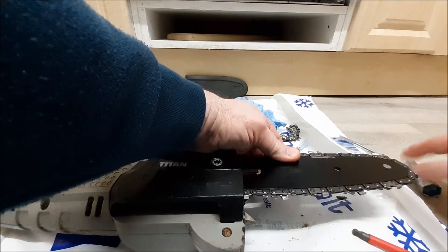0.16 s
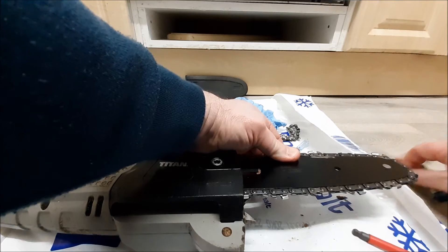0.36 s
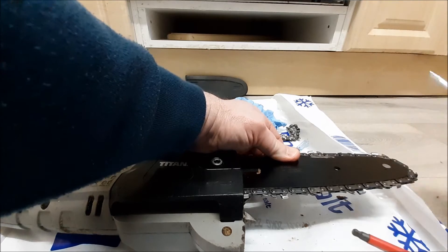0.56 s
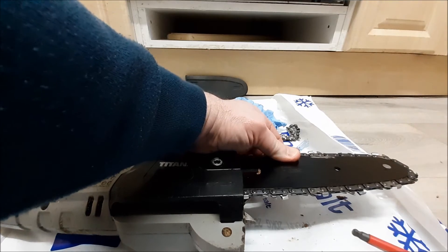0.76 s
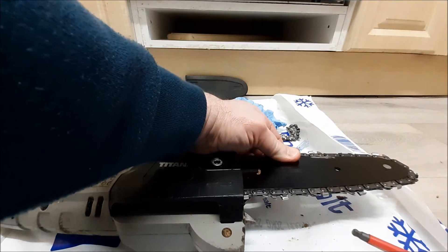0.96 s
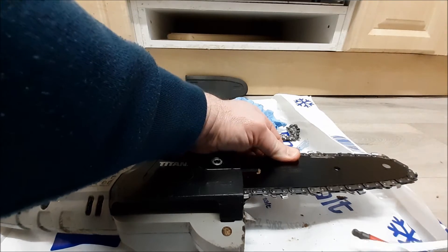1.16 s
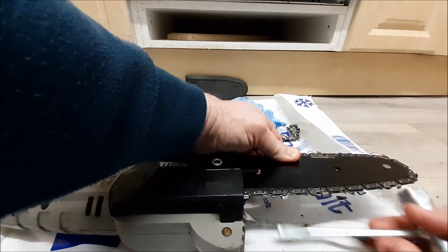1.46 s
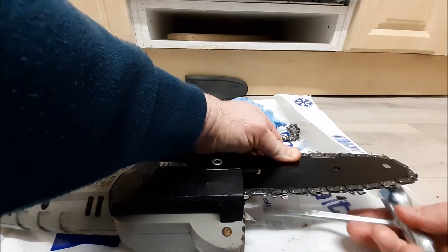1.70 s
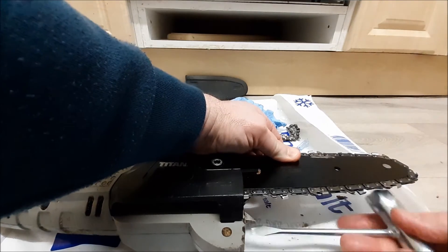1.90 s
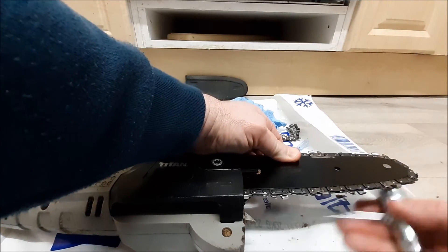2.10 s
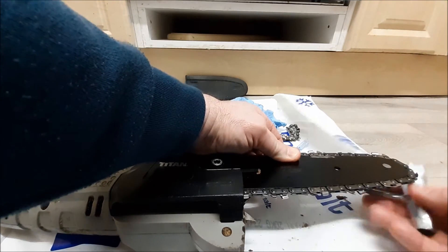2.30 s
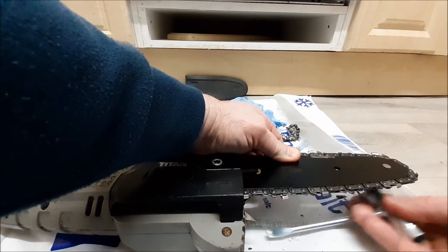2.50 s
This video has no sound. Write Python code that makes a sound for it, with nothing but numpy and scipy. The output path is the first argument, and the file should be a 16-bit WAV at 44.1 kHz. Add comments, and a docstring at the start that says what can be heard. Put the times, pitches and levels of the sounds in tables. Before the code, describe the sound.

A loose saw chain clinks and rattles on its metal bar, heard close in a small kitchen over faint low rumble. A wrench clacks down at 0.35 s; a sleeve swishes softly until about 1.3 s, with a thin ting at 1.0. Light taps and ticks start at 1.5, a bright snap at 1.8, a bar clank at 2.08, then dense scraping rattle, loudest around 2.3, thinning after 2.45.

```python
"""A steel wrench, a slack saw chain and its bar knock together on a kitchen floor, close to the microphone.
The wrench is put down and a sleeve swishes; then the wrench taps the bar and drags the chain along its groove,
so that the links rattle, scrape and snap back with bright clinks. A small room answers over a low rumble.
Knocks are decaying noise bands and ringing modes; scrapes, cloth and rumble are coloured noise."""
import sys
import numpy as np
from scipy import signal
from scipy.fft import rfft, irfft
from scipy.io import wavfile

SR = 44100
rng = np.random.default_rng(int(sys.argv[2]) if len(sys.argv) > 2 else 0)


def file_out(sig):
    """Save sig as 16-bit WAV at sys.argv[1]."""
    # one column per channel
    cols = np.atleast_2d(sig).T
    # limit, then scale
    lim = np.clip(cols, -1, 1)
    pcm = np.round(lim * 32767).astype(np.int16)
    wavfile.write(sys.argv[1], SR, pcm)


N = 116865  # length in samples

# Every left_right_db is the left level over the right: positive leans left.
BLOW_S, RING_S = .01, .5  # stretch that sets a blow's level, longest ring
RUMBLE_PAN_DB = 3  # left over right, for the room rumble and the rocking saw


def undb(db):
    """Decibels to gain."""
    return 10 ** (np.asarray(db) / 20)


def unit(x):
    """Scale to rms 1."""
    return x / np.sqrt(np.mean(x ** 2))


def pan(db):
    """Left and right gains for a level difference."""
    return unit(undb(np.array([[db], [-db]]) / 2))


def noise(likeness, size=N):
    """Left and right noise that are partly alike (1 is mono, 0 is unrelated)."""
    c = np.clip(likeness, -.99, .99)
    mid, side = rng.standard_normal((2, size))
    return np.sqrt((1 + c) / 2) * mid + np.sqrt((1 - c) / 2) * side * np.array([[1], [-1]])


def band(x, low_hz, high_hz):
    """Causal band-pass."""
    edges = [low_hz, min(high_hz, .47 * SR)]
    return signal.sosfilt(signal.butter(N=2, Wn=edges, btype="band", fs=SR, output="sos"), x)


def colour(x, points):
    """Filter a sound through a curve of (Hz, dB) points, straight over log frequency, and set it to rms 1."""
    hz, db = np.array(points).T
    f = np.fft.rfftfreq(N, 1 / SR)
    gain = undb(np.interp(np.log(f + 1), np.log(hz), db))
    return unit(irfft(rfft(x) * gain, N))


def age():
    """Time since a blow, in seconds."""
    return np.arange(int(RING_S * SR)) / SR


def fade(t60):
    """Exponential decay of an amplitude, by 60 dB in t60 seconds."""
    return np.exp(-np.log(1000) * age() / t60)


def blow(x):
    """Scale to rms 1 over the first moments of a blow."""
    return x / np.sqrt(np.mean(x[..., :int(BLOW_S * SR)] ** 2))


def burst(low_hz, high_hz, t60, likeness):
    """A crowd of heavily damped modes in one band, as decaying noise."""
    decaying = noise(likeness, size=len(age())) * fade(t60)
    return blow(band(decaying, low_hz, high_hz))


def tone(hz):
    """One mode at a random phase, reaching the right microphone a little later in phase."""
    right_lag_rad = 1.3 * np.array([[0], [1]])
    return np.sin(2 * np.pi * (hz * age() + rng.random()) - right_lag_rad)


def ring(modes):
    """The fading modes of one struck object, a little different in level and pitch at every blow."""
    out = 0
    for hz, db, t60, left_right_db in modes:
        change_db = rng.uniform(-2.64, 3)
        detune = rng.uniform(-.00704, .008)
        mode = tone(hz * (1 + detune)) * fade(t60)
        out = out + undb(db + change_db) * pan(left_right_db) * mode
    return out


def add(out, s, x):
    """Mix a sound in at a time."""
    i = max(int(s * SR), 0)
    out[:, i:i + x.shape[1]] += x[:, :N - i]


def swell(s, rise, fall):
    """A bell-shaped rise and fall around a moment; the widths are standard deviations in seconds."""
    t = np.arange(N) / SR
    return np.exp(-((t - s) / np.where(t < s, rise, fall)) ** 2 / 2)


def grains(per_s, spread_db, t30):
    """The envelope of a stream of tiny uneven clicks, each falling 30 dB in t30 seconds."""
    size_db = spread_db * np.clip(rng.standard_normal(N), -2, 2)
    clicks = (rng.random(N) < per_s / SR) * undb(size_db)
    power = signal.fftconvolve(clicks ** 2, fade(t30))[:N]  # overlapping clicks add in power
    return np.sqrt(np.abs(power))


def room_rumble():
    """A steady low rumble of coloured noise fills the room."""
    # spectrum of the rumble: pitch_hz [Hz], density_db [dB per Hz]
    spectrum = [(25, -52), (45, -49), (70, -10.5), (97, 1), (125, -6), (170, 3.5), (240, -0.5), (320, 0),
                (450, -14), (800, -16), (1500, -20), (4000, -27), (15000, -33)]
    return undb(-50.5) * pan(RUMBLE_PAN_DB) * colour(noise(likeness=0.78), spectrum)


def room(x):
    """The diffuse tail of a small kitchen: noise bands that build up quickly and decay."""
    # tail bands: low_hz [Hz], high_hz [Hz], t60_s [s], level_db [dB against the direct sound], likeness [-1 to 1]
    tail_bands = [(104, 610, 0.19, -11, 0.52), (470, 2840, 0.32, -8.5, 0.092),
                  (2210, 5860, .3, -4.5, 0.085), (7000, 13500, 0.27, -14, 0.11)]
    onset_s = 0.0045
    build_up = 1 - np.exp(-(age() / onset_s) ** 2)
    tail = 0
    for low_hz, high_hz, t60, db, likeness in tail_bands:
        part = band(noise(likeness, size=len(age())), low_hz, high_hz) * fade(t60) * build_up
        # as much energy as a single click has within this band
        click_rms = np.sqrt(2 * (high_hz - low_hz) / SR / len(age()))
        tail = tail + undb(db) * unit(part) * click_rms
    return signal.fftconvolve(x, tail, axes=1)[:, :N]


def sleeve():
    """Cloth hisses in swelling noise as the arm reaches out and comes back."""
    # strokes of the sleeve: peak_s [s], rise_s [s], fall_s [s], level_db [dB], left_right_db [dB]
    strokes = [(.32, 0.085, 0.062, -50, -5), (0.609, 0.048, 0.042, -47, -7), (1.02, 0.13, 0.055, -46.5, -1),
               (1.25, .14, 0.12, -40.5, -0.5)]
    # spectrum of the cloth: pitch_hz [Hz], density_db [dB per Hz]
    cloth = [(200, -8), (600, 1.5), (1200, -8.5), (2100, 1), (3100, -3), (5500, 0.5), (7600, 1.5),
             (9200, -3), (10500, 2), (13500, -4.5), (16000, -11)]
    power = 0
    for s, rise, fall, db, left_right_db in strokes:
        power = power + (undb(db) * pan(left_right_db) * swell(s, rise, fall)) ** 2
    return np.sqrt(power) * colour(noise(likeness=0.38), cloth)


def rocking():
    """The saw rocks on the floor: its plastic housing rumbles when it is pushed."""
    # pushes: peak_s [s], width_s [s, standard deviation], level_db [dB]
    pushes = [(0.35, 0.018, -57), (1.764, 0.033, -47.5), (1.9, 0.098, -54), (2.162, 0.042, -47),
              (2.326, 0.038, -43.5), (2.38, 0.07, -53)]
    # spectrum of the housing: pitch_hz [Hz], density_db [dB per Hz]
    housing = [(25, -39), (50, -24), (80, 0.5), (140, -4.5), (240, 1), (330, -17), (600, -27), (2000, -37)]
    push = sum(undb(db) * swell(s, width, width) for s, width, db in pushes)
    return push * pan(RUMBLE_PAN_DB) * colour(noise(likeness=0.96), housing)


def tings():
    """The wrench tings faintly in the hand, with one thin high mode."""
    # tings of the wrench: start_s [s], level_db [dB]
    moments = [(0.704, -57), (1.0, -44.5)]
    out = np.zeros((2, N))
    for s, db in moments:
        add(out, s, undb(db) * tone(8890) * fade(0.3))
    return out


def scrapes_and_hisses():
    """Short scrapes and hisses swell in fine grains, as the wrench settles on a plastic sheet,
    crosses the cutters, and cloth or plastic brushes by."""
    # scrapes and hisses: peak_s [s], rise_s [s], fall_s [s], level_db [dB], low_hz [Hz], high_hz [Hz]
    strokes = [(.372, 0.021, 0.025, -54, 1500, 4200), (1.548, 0.0031, 0.006, -43, 900, 1900),
               (1.627, 0.0025, .004, -46, 950, 1800), (1.734, 0.017, 0.019, -38.5, 890, 2000),
               (2.24, 0.074, .028, -36.5, 10800, 15500), (2.394, 0.015, 0.017, -38.5, 1190, 1700),
               (2.403, .002, 0.0054, -36, 11500, 15500)]
    grit = grains(per_s=1100, spread_db=3, t30=0.0095) * noise(likeness=.2)
    out = 0
    for s, rise, fall, db, low_hz, high_hz in strokes:
        out = out + undb(db) * swell(s, rise, fall) * unit(band(grit, low_hz, high_hz))
    return out


def effort(s):
    """How hard the chain is being dragged, as a gain; almost nothing before the first point."""
    # pull along the groove: time_s [s], level_db [dB against the hardest pull]
    pull = [(1.481, -20), (1.55, -24.5), (1.61, -35), (1.70, -22.5), (1.745, -16), (1.80, -16.5),
            (1.89, -18.5), (2.06, -25.5), (2.10, -7.5), (2.15, -3.5), (2.19, -4), (2.22, -1), (2.275, 0),
            (2.32, -9), (2.35, -15.5), (2.40, -6.5), (2.45, -13.5), (2.51, -17), (2.571, -11), (2.65, -16)]
    return undb(np.interp(s, *np.array(pull).T, left=-90))


def cutters():
    """Loose cutters tick on the bar at uneven moments and pitches, more often and louder under a harder pull."""
    most_per_s, overtone_ratio, t60_s = 130, 1.53, 0.012
    low_hz, high_hz = 800, 6000
    out = np.zeros((2, N))
    for slot in np.arange(0, N / SR, 1 / most_per_s):
        late, pitch, size, chance = rng.random(4)
        s = slot + late / most_per_s
        hz = low_hz * (high_hz / low_hz) ** pitch
        tick = tone(hz) + tone(hz * overtone_ratio)
        level_db = -46.25 + 11 * size  # at the hardest pull
        if chance < effort(s) and s < N / SR:
            add(out, s, effort(s) * undb(level_db) * blow(tick * fade(t60_s)))
    return out


def dragged_chain():
    """Drive links scrape in the groove while their rivets rattle in a stream of tiny clicks."""
    # spectrum of the rattling links: pitch_hz [Hz], density_db [dB per Hz]
    rattle_spectrum = [(100, -3), (400, 1.5), (750, 8), (1400, 8.5), (2300, -22), (4500, 5), (8500, -27),
                       (10000, -11), (15500, -2.5)]
    # spectrum of the sliding steel: pitch_hz [Hz], density_db [dB per Hz]
    scrape_spectrum = [(100, -31), (400, 1), (1000, -2.5), (1900, 5.5), (3200, -2.5), (6300, -1),
                       (8200, 1.5), (9700, -6), (12000, 0), (15500, -9)]
    clicks = grains(per_s=200, spread_db=5.5, t30=.004) * noise(likeness=0.43)
    rattle = undb(-36.5) * colour(clicks, rattle_spectrum)
    scrape = undb(-33.5) * pan(-1.5) * colour(noise(likeness=0.49), scrape_spectrum)
    return effort(np.arange(N) / SR) * (rattle + scrape)


def link(hz):
    """A brief ring of one link, buzzing against its neighbours, then a thin after-ring at the same pitch."""
    t60_s, width_hz = .012, 1100
    buzz = burst(hz - width_hz / 2, hz + width_hz / 2, t60_s, likeness=-0.22)
    envelope = fade(t60_s) + undb(-29) * fade(.14)
    return blow(blow(tone(hz) * envelope) + undb(-7.5) * buzz)


def clinks():
    """A link snaps against the bar with a noisy crack and two brief rings; the rest of the chain shivers on."""
    # clinks: start_s [s], crack_db [dB], low_ring_hz [Hz], low_ring_db [dB], high_ring_hz [Hz],
    # high_ring_db [dB], left_right_db [dB]
    snaps = [(1.8162, -24, 10110, -28.5, 12800, -28.5, 0.5), (2.01, -29, 10500, -38, 14500, -28, -2),
             (2.2504, -31, 9600, -32, 10700, -34, -10), (2.358, -28.5, 8260, -18.5, 8770, -22, -6),
             (2.358, -36, 5820, -36, 14200, -37, -3)]
    crack_low_hz, crack_high_hz = 7140, 16800
    out = np.zeros((2, N))
    for s, crack_db, low_hz, low_db, high_hz, high_db, left_right_db in snaps:
        crack = burst(crack_low_hz, crack_high_hz, t60=.008, likeness=0.042)
        shiver = undb(-11.5) * burst(crack_low_hz, crack_high_hz, t60=0.15, likeness=0.49)
        rings = undb(low_db) * link(low_hz) + undb(high_db) * link(high_hz)
        add(out, s, pan(left_right_db) * (undb(crack_db) * (crack + shiver) + rings))
    return out


def bar_taps():
    """The wrench strikes the flat steel bar squarely and bounces; the bar clanks in its modes."""
    # strike and bounce: start_s [s], level_db [dB]
    taps = [(2.0772, -17.5), (2.088, -26.5)]
    # modes of the bar: pitch_hz [Hz], level_db [dB], t60_s [s], left_right_db [dB]
    bar_modes = [(1400, -1, 0.026, 5), (1540, -1.5, 0.026, 6), (2250, -6, 0.115, -8),
                 (3080, -0.5, 0.012, -8), (4370, 0, 0.012, -4), (4960, -1, 0.012, -5),
                 (7150, -23, 0.076, -2), (9000, -22, .1, 9)]
    out = np.zeros((2, N))
    for s, db in taps:
        add(out, s, undb(db) * ring(bar_modes))
    return out


def knocks():
    """Each contact is a short clack, pitched by where it lands, and leaves body and chain ringing faintly."""
    # contacts of wrench, chain and bar: start_s [s], thud_db [dB], clack_db [dB], clack_centre_hz [Hz],
    # rasp_db [dB], tick_db [dB], left_right_db [dB]
    contacts = [ (.018, -50, -52, 920, -63, -76, -3), (0.349, -40, -31.5, 1060, -38, -52, 1),
                (.361, -44, -45, 746, -63, -66, 0), (0.3698, -45, -39, 970, -62, -68, 2),
                (.375, -43, -44, 705, -69, -66, -4), (1.5141, -45, -39.5, 1190, -55, -61, -5.5),
                (1.5231, -55, -54.5, 1100, -53, -64, 2), (1.544, -63, -62, 1290, -55, -56, -1),
                (1.5526, -50.5, -41, 1570, -53, -43.5, 0), (1.634, -52, -42.5, 1310, -43, -41.5, 2.5),
                (1.6642, -60, -57, 1810, -41, -46.5, 0.5), (1.7086, -48.5, -43, 1500, -57, -53, 3),
                (1.726, -58, -43, 1470, -47, -41, -1), (1.7325, -49, -38, 1470, -49, -41, 8),
                (1.7435, -49.5, -38, 1400, -48, -50, -14), (1.753, -43.5, -40.5, 1210, -48, -53, 2),
                (1.8308, -46.5, -39.5, 970, -47, -55, 0), (1.9285, -43.5, -45.5, 1320, -58, -65, 2.5),
                (1.989, -49, -41, 1400, -52.5, -72, -2.5), (2.04, -45.5, -50.5, 600, -50, -78, 5),
                (2.071, -54, -45, 1510, -51, -41, 2), (2.077, -53, -32.5, 1470, -33.5, -36.5, 2),
                (2.0872, -64, -39, 1450, -42, -45, 5), (2.0963, -53, -60, 1200, -49, -39.5, 13),
                (2.118, -61, -33.5, 980, -38, -56, 0), (2.137, -39.5, -29.5, 1200, -34.5, -57, -0.5),
                (2.153, -42, -35, 1180, -44, -40, -2), (2.1725, -44, -40, 696, -48, -52, 2),
                (2.1921, -45, -30.5, 2300, -42, -45, -7), (2.2025, -46, -28.5, 1480, -34.5, -40, -7),
                (2.2074, -43, -32.5, 1940, -50, -43, 4), (2.2165, -41, -36, 1100, -40, -44, 3),
                (2.2354, -50, -39, 1900, -42, -39, -4), (2.2649, -47, -30, 2440, -43, -37, 2),
                (2.2707, -50, -38, 1900, -37, -38, -3), (2.2886, -33.5, -23.5, 1050, -35, -45, 6),
                (2.2957, -35, -33, 890, -39, -40, -4), (2.3029, -30, -27.5, 760, -41, -51, 2),
                (2.31, -37, -30, 1210, -41, -54, -2), (2.318, -41, -37, 1100, -48, -57, 2),
                (2.3578, -37, -22, 1130, -42, -27, 0), (2.3646, -42.5, -48, 910, -38.5, -48, 4),
                (2.4233, -39.5, -31, 930, -35, -31.5, 0.5), (2.434, -48, -32.5, 900, -45, -39.5, 2),
                (2.4389, -43.5, -60, 1110, -40.5, -30.5, -0.5), (2.4703, -51, -42, 1090, -57, -49, -5),
                (2.581, -49, -49, 1200, -48, -48, 0), (2.615, -60, -54, 1050, -55, -48, 0),
                (2.6322, -40.5, -44, 875, -52, -47.5, 1)]
    # broad parts of a contact, in rows thud, rasp, tick: low_hz [Hz], high_hz [Hz], t60_s [s],
    # left_right_db [dB, added to the contact's own], likeness [-1 to 1]
    parts = [(116, 510, 0.048, 2, 0.97), (2350, 5340, 0.018, -3, 0.067), (5730, 13100, 0.02, -1.5, 0.1)]
    # modes of the saw body: pitch_hz [Hz], level_db [dB against the clack], t60_s [s], left_right_db [dB]
    body_modes = [(510.6, -20, 0.18, 23), (558, -13.5, 0.08, -2), (707, -12, 0.14, 13),
                  (782, -13.5, 0.21, -1), (994, -28, 0.15, 17), (1073, -19, 0.11, 7),
                  (1138, -19, 0.15, 2.5), (1400, -21, 0.15, -5), (1530, -19.5, 0.22, 13),
                  (1868, -18.5, 0.18, -2), (2290, -21, 0.15, -8), (2570, -25, 0.18, 2)]
    # modes of the chain: pitch_hz [Hz], level_db [dB against the tick], left_right_db [dB]
    chain_modes = [(4420, -16, 0), (5460, -9, 12), (8350, -7.5, -3), (8940, -9, -4)]
    chain = [(hz, db, .1, left_right_db) for hz, db, left_right_db in chain_modes]  # all with a t60 of 0.1 s
    half = 2 ** (0.87 / 2)  # the clack is 0.87 octaves wide
    out = np.zeros((2, N))
    for s, thud_db, clack_db, clack_hz, rasp_db, tick_db, left_right_db in contacts:
        hit = 0
        for db, (low_hz, high_hz, t60, lean_db, likeness) in zip((thud_db, rasp_db, tick_db), parts):
            hit = hit + undb(db) * pan(left_right_db + lean_db) * burst(low_hz, high_hz, t60, likeness)
        clack = burst(clack_hz / half, clack_hz * half, t60=0.027, likeness=0.02)
        clack = pan(left_right_db + 4.5) * clack  # leans 4.5 dB further left
        add(out, s, hit + undb(clack_db) * (clack + ring(body_modes)) + undb(tick_db) * ring(chain))
    return out


def scene():
    """Knocks, chain, scrapes and hisses in the room, with the housing, the sleeve and the rumble."""
    contact = knocks() + bar_taps() + clinks() + cutters() + dragged_chain() + scrapes_and_hisses() + tings()
    return contact + room(contact) + rocking() + sleeve() + room_rumble()


def record(dry):
    """The recorder clips at 0.85 of full scale, then a steep low-pass cuts the top above 15.9 kHz."""
    clipped = np.clip(dry, -.85, .85)
    return signal.sosfilt(signal.ellip(10, .2, 80, 15900, fs=SR, output="sos"), clipped)


dry = scene()
out = record(dry)
file_out(out)
```